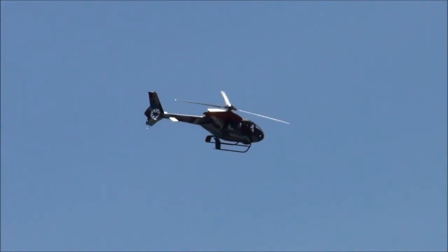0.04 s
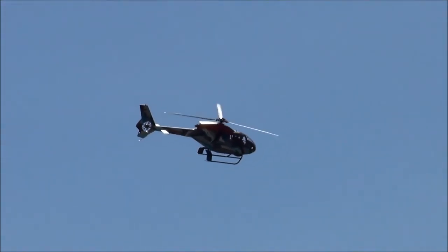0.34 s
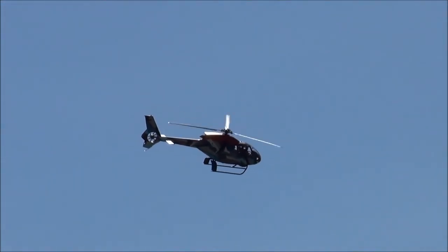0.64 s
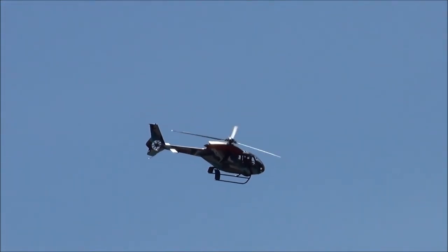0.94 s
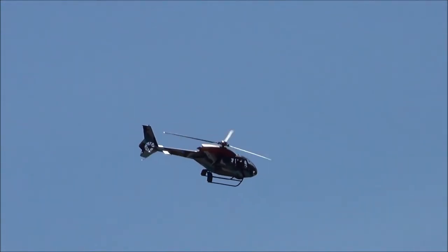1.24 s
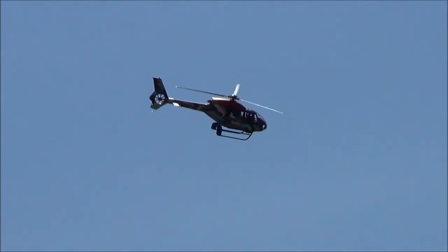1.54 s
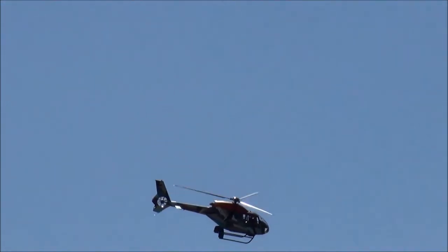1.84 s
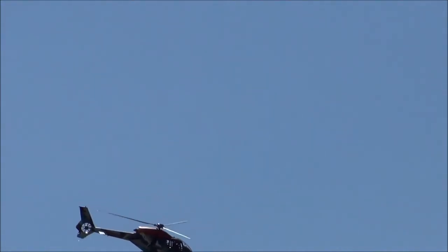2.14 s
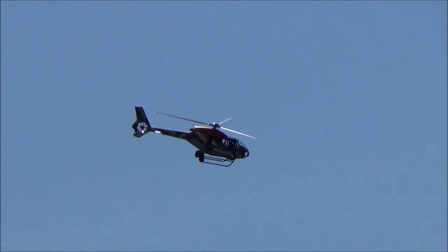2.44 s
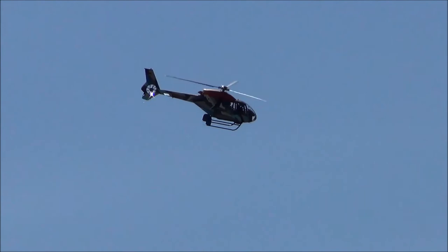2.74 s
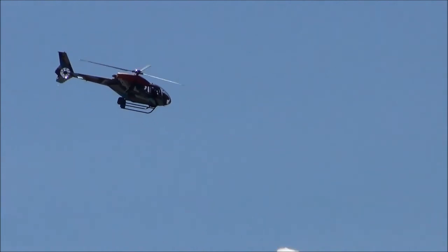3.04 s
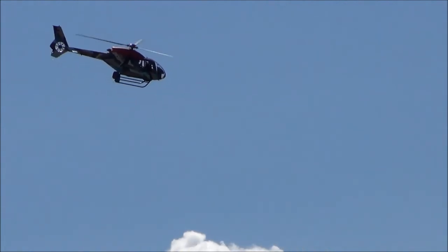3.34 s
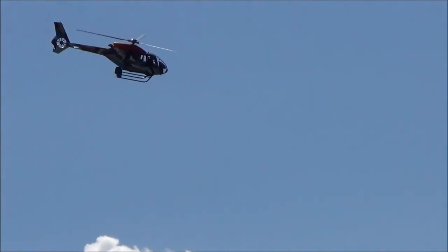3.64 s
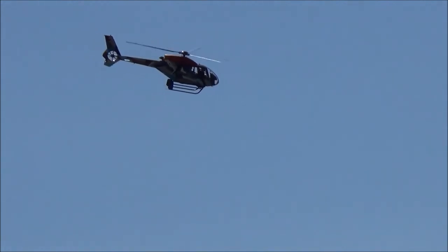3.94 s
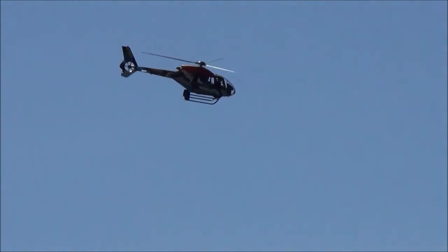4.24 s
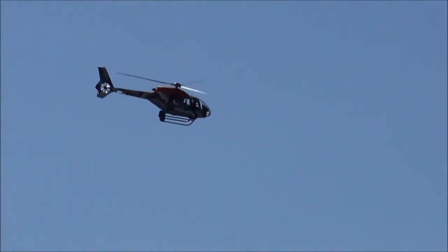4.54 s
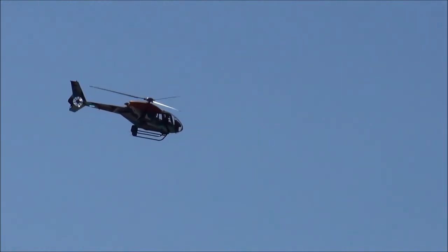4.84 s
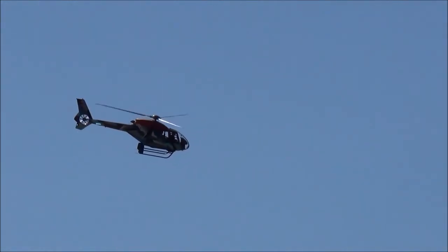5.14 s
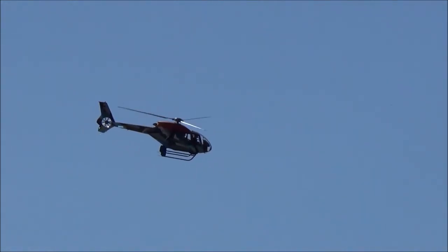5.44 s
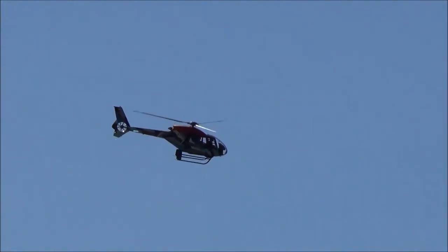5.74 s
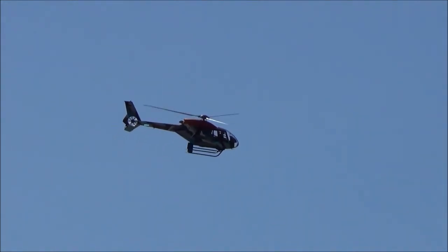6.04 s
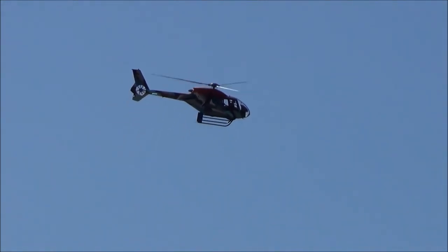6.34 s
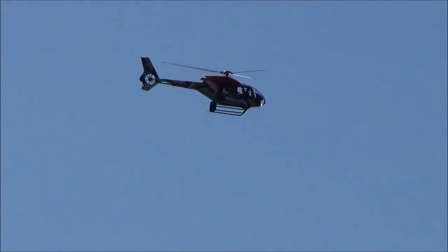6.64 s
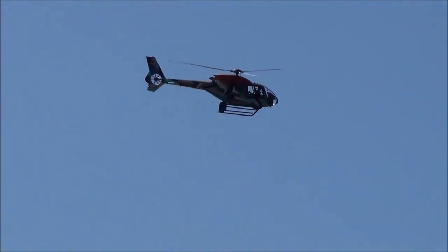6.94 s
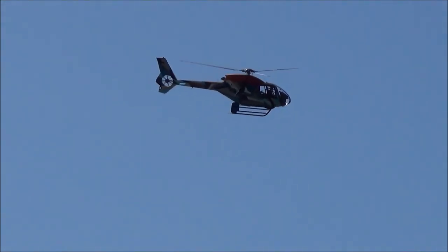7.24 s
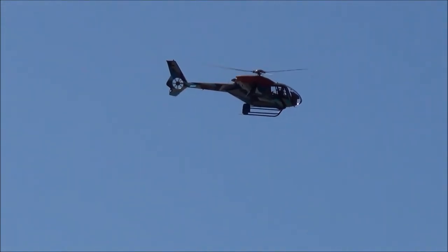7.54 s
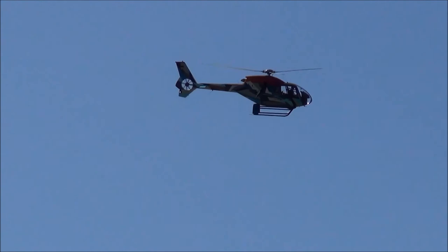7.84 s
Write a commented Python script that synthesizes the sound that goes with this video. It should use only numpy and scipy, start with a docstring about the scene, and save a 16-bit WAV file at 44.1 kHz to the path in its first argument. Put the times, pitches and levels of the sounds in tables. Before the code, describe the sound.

Fast, airy blade swish and a humming drone from a small, far-off helicopter waver on gusts, with very faint high insects behind.

```python
"""Rotor blades swish 20 times a second as a light helicopter passes slowly, far off in open air.
Under the swish: drone and rush of the shrouded tail fan, exhaust roar, a thin compressor whine.
Gusty air swells and fades the sound; two reflections sweep combs through it.
Insects rasp faintly and very high; wind rumbles on the microphone."""
import sys
import numpy as np
from scipy import signal
from scipy.fft import rfft, irfft, next_fast_len
from scipy.io import wavfile
from scipy.ndimage import uniform_filter1d, minimum_filter1d, map_coordinates

SR = 44100
rng = np.random.default_rng(int(sys.argv[2]) if len(sys.argv) > 2 else 0)


def store_wav(level_fs):
    """Save 16-bit WAV to argv[1]."""
    pcm = np.round(np.clip(np.atleast_2d(level_fs), -1, 1) * 32767)
    wavfile.write(sys.argv[1], SR, pcm.T.astype(np.int16))


N = 347508
TIME = np.arange(N) / SR

# Rotor speeds (time [s], main blade passes [1/s], drone pitch [Hz])
ROTOR_SPEEDS = [(0.0, 19.41, 144.5), (1.0, 19.57, 145.4), (2.0, 19.68, 146.8), (3.0, 19.73, 148.0),
                (4.0, 19.8, 148.5), (5.0, 20.01, 149.4), (6.0, 20.06, 149.9), (7.0, 19.92, 150.1),
                (7.88, 19.82, 150.2)]
# Swish swelling in gusty air (time [s], level [dB])
SWISH_LEVEL = [(0.0, -21.5), (0.37, -32.5), (0.62, -21.5), (1.62, -23.5), (1.85, -20.5), (2.05, -24.5),
               (2.52, -20), (2.8, -30), (2.91, -26), (3.36, -28), (3.49, -21.5), (3.57, -27), (3.69, -15.5),
               (3.8, -28), (4.18, -32), (4.69, -23), (4.8, -30.5), (4.91, -21.5), (5.12, -32.5),
               (5.22, -25.0), (5.33, -28.5), (5.97, -21.0), (6.3, -25), (6.8, -25.5), (6.96, -20.5),
               (7.1, -28.5), (7.68, -36.5), (7.88, -31)]
# Blade passes that stand out (time [s], boost [dB])
ACCENTS = [(.588, 4.5), (2.945, 2), (3.494, 0.5), (4.904, 4), (6.3, 2.5), (6.5, 0.5), (6.597, 4),
           (6.708, 6), (7.004, 4), (7.055, -1), (7.255, 2)]
# Bright rotor whooshes (time [s], half width [s], treble boost [dB])
ROTOR_WHOOSHES = [(1.06, 0.14, 3), (2.15, 0.26, 5), (2.9, 0.091, 6), (3.45, 0.051, 4.5), (4.68, 0.023, 5),
                  (5.23, 0.045, 7.5), (6.13, 0.11, 4.5), (6.4, .04, 4), (6.91, 0.037, 8), (7.02, 0.051, 7),
                  (7.16, 0.0089, 12)]
# Thump partials (multiple of blade rate, relative level [dB])
THUMP_PARTIALS = [(2, -2), (3, 6.5), (4, 10.5), (5, 9), (6, 10), (7, -12), (8, -12), (9, 5.5)]
# Tail fan envelope (time [s], level [dB])
FAN_LEVEL = [(0.0, -31.5), (0.2, -30), (0.34, -39.5), (0.52, -31), (1.86, -33.5), (2.9, -31), (3.14, -36),
             (3.52, -33.0), (3.61, -28), (3.88, -40.0), (4.14, -40), (5.0, -32.5), (5.46, -39), (5.72, -31),
             (7.03, -32), (7.56, -38), (7.88, -32.5)]
# Drone partials (multiple of drone pitch, relative level [dB])
DRONE_PARTIALS = [(2, -25), (5, -4.5), (6, -12), (7, -17)]
# Fourth partial, beamed unevenly with angle (time [s], relative level [dB])
FOURTH_LEVEL = [(0, -3.5), (1.1, -4.5), (2.5, -10), (3, -6.5), (4, -17.5), (5.3, -15.5), (5.9, -7.5),
                (7.88, -10)]
# Exhaust roar (time [s], level [dB])
EXHAUST_LEVEL = [(0, -38), (.65, -37.5), (1, -33.5), (1.7, -32), (2.5, -36), (3, -35.5), (4.2, -39),
                 (5.4, -37), (6.4, -34), (7.88, -38)]
# Reflections off the ground and a nearer surface (time [s], delay [ms], strength [0-1])
GROUND_PATH = [(0, 4.05, 0.32), (.7, 3, 0.14), (1.35, 3.15, 0.2), (2, 2.7, 0.41), (3.3, 3.035, 0.14),
               (4.3, 2.56, .3), (5.9, 2.5, 0), (7.88, 3.1, 0.26)]
WALL_PATH = [(0, 1.77, .55), (.22, 1.7, .4), (.4, 1.44, .45), (.9, 1.45, .7), (1.4, 1.36, .7),
             (2.15, 1.37, .6), (2.55, 1.31, .7), (2.9, 1.22, .25), (3.6, 1.24, .1), (7.88, 1.3, .08)]
# Helicopter balance (time [s], left minus right [dB])
BALANCE = [(0, -1.2), (.7, -1.3), (1.5, -.7), (3, .1), (5.8, .5), (7.88, .2)]
# Nearest insect (start [s], end [s], final ring pitch [Hz], final ring re bout [dB],
# final level [dB], rise [dB/s])
INSECT_BOUTS = [(2.75, 3.57, 14100, -13, -47, 14), (4.0, 6.956, 13700, -3, -51, -0.5),
                (7.36, 7.95, 14650, -6, -51, -2)]
# Noise spectra (frequency [Hz], relative density [dB])
SWISH_SPECTRUM = [(500, -57), (950, -11.5), (1150, -5.5), (1350, -2), (1600, 2), (2200, 0.5), (3000, -4.5),
                  (4000, -10.5), (5000, -16.5), (6300, -26), (8000, -37.5), (10000, -55), (14000, -77)]
FAN_SPECTRUM = [(300, -57), (490, -6.5), (590, 3), (700, 1.5), (790, 5), (880, 0.5), (960, -2.5), (1080, 1),
                (1400, -2), (2500, -49)]
EXHAUST_SPECTRUM = [(25, -55), (60, -50), (120, -15), (185, -10.5), (235, -4.5), (280, 1.5), (315, 0),
                    (360, -5), (430, -8.5), (500, -20), (900, -56), (3000, -64)]
INSECT_SPECTRUM = [(3000, -22), (9000, -15), (10200, -15), (12000, -8.5), (13000, -2.5), (14000, 0),
                   (15700, 0)]
WIND_SPECTRUM = [(10, -19), (25, -8), (50, 7), (100, -26), (200, -20), (600, -44), (3000, -86)]


def blade_swish(blade_cycles, drone_cycles, throb_db=1.65, notch_db=0.75, flutter_db=0.35, trim_db=-1.12):
    """Blade turbulence: loud as each blade advances, briefly thin between two."""
    angle = 2 * np.pi * blade_cycles
    beat_db = throb_db * np.cos(angle) - notch_db * np.cos(2 * angle)
    level_db = follow(SWISH_LEVEL)[0] + trim_db + beat_db + accent_db() + flutter_db * wander(210)
    buzz = 1 + 0.074 * np.cos(2 * np.pi * drone_cycles)
    return noise(SWISH_SPECTRUM) * amp(level_db) * buzz


def accent_db(t=TIME, half_width_s=.012):
    """Boost of the blade passes that stand out."""
    return bumps([(at_s, half_width_s, db) for at_s, db in ACCENTS], t)


def blade_thump(blade_cycles, level_db=-55.5, waver_db=1.5):
    """Low flutter of the passing blades: blade-rate harmonics at random phases."""
    partials = sum(amp(db) * np.sin(2 * np.pi * (k * blade_cycles + rng.random()))
                   for k, db in THUMP_PARTIALS)
    return evened(partials) * amp(level_db - waver_db * wander(0.94))


def fan_drone(drone_cycles, trim_db=1.5, hum_db=-53, fade_db_per_s=.25, waver_db=2.5, jitter_rad=.45):
    """Tail fan tones, wavering in level and phase; the overtones sink as the tail turns."""
    fan_db = follow(FAN_LEVEL)[0] + trim_db - fade_db_per_s * TIME
    partials = [(1, hum_db), (4, fan_db + follow(FOURTH_LEVEL)[0])]
    partials += [(k, fan_db + db) for k, db in DRONE_PARTIALS]
    drone = np.zeros(N)
    for k, db in partials:
        gain = amp(db + waver_db * wander(12))
        angle = 2 * np.pi * (k * drone_cycles + rng.random()) + jitter_rad * wander(19)
        drone += gain * np.cos(angle)
    return drone


def fan_rush(drone_cycles, trim_db=0.02, chop_depth=0.031):
    """Air through the tail shroud, chopped by the fan."""
    chop = 1 + chop_depth * np.cos(2 * np.pi * drone_cycles)
    return noise(FAN_SPECTRUM) * amp(follow(FAN_LEVEL)[0] + trim_db) * chop


def turbine(whine_multiple=64, whine_db=-67.5, fade_db_per_s=0.5, twinkle_db=1.0):
    """Combustion roar from the exhaust; a compressor whine that tracks the drone and flares once."""
    whine_hz = whine_multiple * follow(ROTOR_SPEEDS)[1]
    flare_db = bumps([(6.8, 0.1, 12)])
    whine_gain = amp(whine_db - fade_db_per_s * TIME + flare_db + twinkle_db * wander(18))
    roar = noise(EXHAUST_SPECTRUM) * amp(follow(EXHAUST_LEVEL)[0])
    return roar + whistle(whine_hz, width_hz=120) * whine_gain


def open_air(x, twinkle_db=1.8, shimmer_db=1.7, flicker_db=1.0, usual_swish_db=-24.5, shelf_db=-2):
    """Eddies brighten and dull the sound in narrow lasting patches and broad brief ones."""
    hz, t, spectrum = signal.stft(x, SR, nperseg=1024, noverlap=768)
    hz = hz[:, None]
    shelf = np.clip(np.log(hz / 2300 + 1e-9) / np.log(4200 / 2300), 0, 1)
    swell_db = follow(SWISH_LEVEL, t)[0] - usual_swish_db
    treble_db = shelf_db - 0.55 * swell_db  # treble follows only part of each swell
    treble_db += bumps(ROTOR_WHOOSHES, t) + 0.26 * accent_db(t)
    treble_db += flicker_db * np.interp(t, TIME, wander(24))
    scatter = np.clip(hz / 1800, 0, 1.2) ** .5
    narrow_db = twinkle_db * patches(spectrum.shape, size=(3, 20))
    broad_db = shimmer_db * patches(spectrum.shape, size=(24, 3))
    gain = amp(shelf * treble_db + scatter * (narrow_db + broad_db))
    return signal.istft(spectrum * gain, SR, nperseg=1024, noverlap=768)[1][:N]


def reflection(x, path, low_hz, high_hz, rebound=0):
    """Delayed copy of one band, with optional rebound; the moving delay sweeps a comb."""
    delay_ms, strength = follow(path)
    hz = np.fft.rfftfreq(N, 1 / SR)
    # long waves bend round the surface, short ones scatter off its roughness
    passband = np.exp(-(hz / high_hz) ** 4) * (1 - np.exp(-(hz / low_hz) ** 4))
    band = irfft(rfft(x) * passband, N)
    once, twice = (map_coordinates(band, [(TIME - k * delay_ms / 1000) * SR], order=3) for k in (1, 2))
    rebound_gain = rebound * strength ** 2
    comb = band + strength * once + rebound_gain * twice
    return x - band + comb / np.sqrt(1 + strength ** 2 + rebound_gain ** 2)


def scattered_echoes(x, level_db=-25, t60_s=0.023, cutoff_hz=5500):
    """Faint diffuse echoes, opposite in sign left and right."""
    t = TIME[:SR // 4]
    tail = rng.standard_normal(len(t)) * amp(-60 * t / t60_s)
    side = signal.fftconvolve(x, tail / np.linalg.norm(tail))[:N] * amp(level_db)
    side = signal.sosfilt(signal.butter(4, cutoff_hz, fs=SR, output="sos"), side)
    return np.array([side, -side])


def insects(chorus_db=-52, far_db=-63, far_pulse_hz=99, near_pulse_hz=90):
    """A distant hissing chorus and two singers rasping in fast pulses."""
    pulse_hz = near_pulse_hz * (1 + 0.0415 * wander(1.43))
    chorus = noise(INSECT_SPECTRUM) * amp(chorus_db + .8 * wander(2))
    far = noise(INSECT_SPECTRUM) * pulsing(far_pulse_hz, sharpness=8) * amp(far_db)
    return chorus + far + near_insect(pulse_hz)


def near_insect(pulse_hz, attack_s=.1, release_s=.03, glide_hz_per_s=260, hold_s=1.65, ring_db_per_s=3.2):
    """Bouts of rasp with a thin ring emerging; in a long bout the ring glides up, then holds."""
    rasp = noise(INSECT_SPECTRUM) * pulsing(pulse_hz, sharpness=2.5) * amp(-3)
    throb = pulsing(pulse_hz, sharpness=0.5)
    song = np.zeros(N)
    for start_s, end_s, ring_hz, ring_db, end_db, rise_db_per_s in INSECT_BOUTS:
        gate = np.clip(np.minimum((TIME - start_s) / attack_s, (end_s - TIME) / release_s), 0, 1)
        left_s = np.clip(end_s - TIME, 0, end_s - start_s)
        hz = ring_hz - glide_hz_per_s * np.maximum(left_s - hold_s, 0)
        ring = whistle(hz, width_hz=135) * throb * amp(ring_db - ring_db_per_s * left_s)
        song += (rasp + ring) * gate * amp(end_db - rise_db_per_s * left_s)
    return song


def wind(level_db=-65, gust_db=2, spread=0.31):
    """Light gusts rumble on the microphone, slightly different at each port."""
    ports = noise(WIND_SPECTRUM) + spread * np.array([noise(WIND_SPECTRUM), noise(WIND_SPECTRUM)])
    return ports * amp(level_db + gust_db * wander(3.4))


def amp(db):
    """Decibels to gain."""
    return 10 ** (np.asarray(db) / 20)


def evened(x):
    """Scale to rms 1."""
    return x / np.sqrt(np.mean(x ** 2) + 1e-20)


def follow(table, t=TIME):
    """Value columns of a table, interpolated at times t."""
    times_s, *columns = np.transpose(table)
    return [np.interp(t, times_s, column) for column in columns]


def bumps(rows, t=TIME):
    """Sum of Gaussian bumps (time [s], half width [s], height [dB])."""
    return sum(db * np.exp(-((t - at_s) / half_s) ** 2) for at_s, half_s, db in rows)


def noise(spectrum):
    """Noise of the given spectrum, rms 1."""
    points_hz, points_db = np.transpose(spectrum)
    hz = np.fft.rfftfreq(N, 1 / SR)
    gain = amp(np.interp(np.log(hz + 1), np.log(points_hz + 1), points_db))
    return evened(irfft(rfft(rng.standard_normal(N)) * gain, N))


def wander(rate_hz):
    """Smooth random drift up to about rate_hz, rms 1."""
    size = next_fast_len(N, real=True)
    hz = np.fft.rfftfreq(size, 1 / SR)
    lowpass = np.exp(-np.minimum(hz / rate_hz, 10) ** 2)
    return evened(irfft(rfft(rng.standard_normal(size)) * lowpass, size)[:N])


def whistle(hz, width_hz):
    """Fuzzy tone on a pitch curve, rms 1."""
    angle = 2 * np.pi * np.cumsum(hz) / SR
    return wander(width_hz) * np.cos(angle) + wander(width_hz) * np.sin(angle)


def pulsing(rate_hz, sharpness):
    """Pulse-train envelope, rms 1."""
    angle = 2 * np.pi * np.cumsum(rate_hz * np.ones(N)) / SR
    return evened(np.exp(sharpness * np.cos(angle)))


def patches(shape, size):
    """Random blotches smoothed over size = (bins, frames), rms 1."""
    field = rng.standard_normal(shape)
    for axis in (0, 1, 0, 1):
        field = uniform_filter1d(field, size[axis], axis)
    return evened(field)


def scene():
    """The helicopter drifts across the stereo centre, over insects and wind."""
    blade_hz, drone_hz = follow(ROTOR_SPEEDS)
    blade_cycles = .46 + np.cumsum(blade_hz) / SR
    drone_cycles = np.cumsum(drone_hz) / SR
    rush = open_air(blade_swish(blade_cycles, drone_cycles) + fan_rush(drone_cycles)) + turbine()
    rush = reflection(rush, GROUND_PATH, low_hz=60, high_hz=3320)
    rush = reflection(rush, WALL_PATH, low_hz=566, high_hz=3240, rebound=0.3)
    helicopter = rush + fan_drone(drone_cycles) + blade_thump(blade_cycles)
    pan_db = follow(BALANCE)[0]
    direct = helicopter * amp(np.array([pan_db, -pan_db]) / 2)
    return direct + scattered_echoes(helicopter) + insects() + wind()


def record(dry, threshold=.33, cutoff_hz=15780):
    """A limiter ducks the highest peaks for a few milliseconds; then a steep low-pass."""
    allowed = np.minimum(1, threshold / (abs(dry).max(0) + 1e-9))
    gain = minimum_filter1d(allowed, size=301)
    for _ in range(2):
        gain = uniform_filter1d(gain, size=151)
    lowpass = signal.firwin(1023, cutoff_hz, window=("kaiser", 9), fs=SR)
    return signal.oaconvolve(dry * gain, lowpass[None], "same", axes=1)


dry = scene()
out = record(dry)
store_wav(out)
```